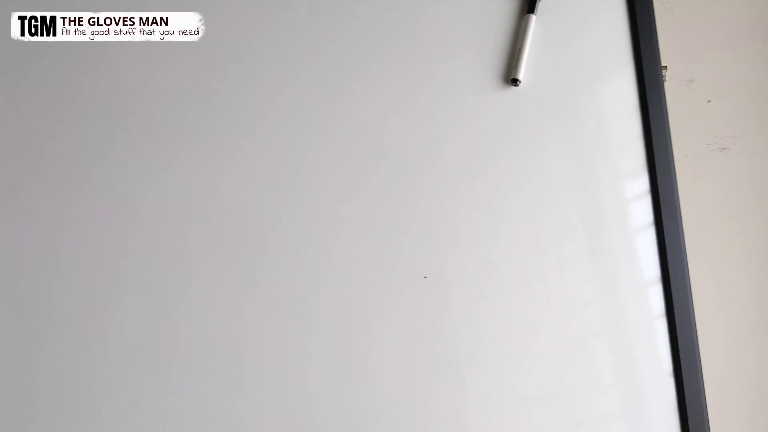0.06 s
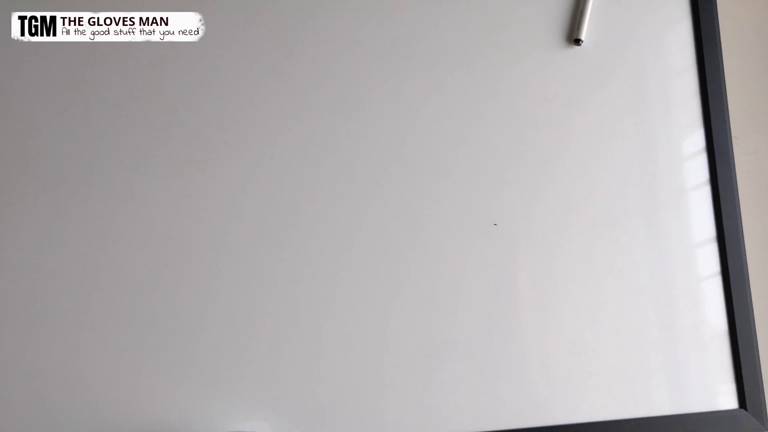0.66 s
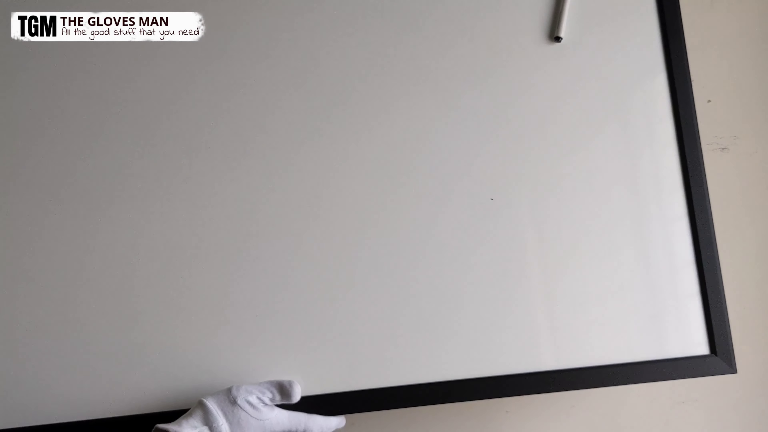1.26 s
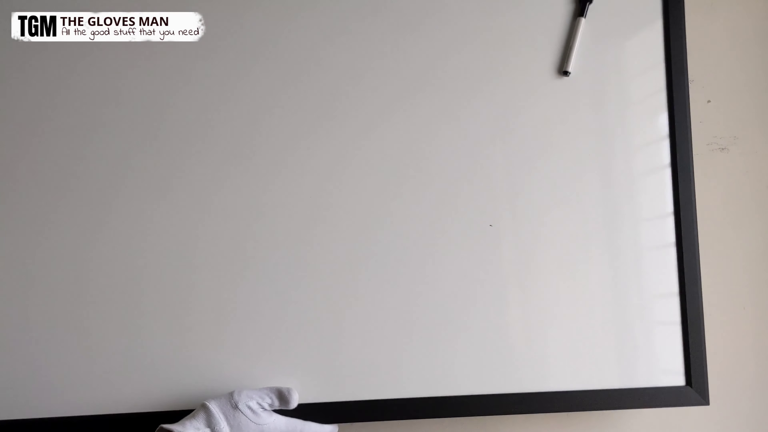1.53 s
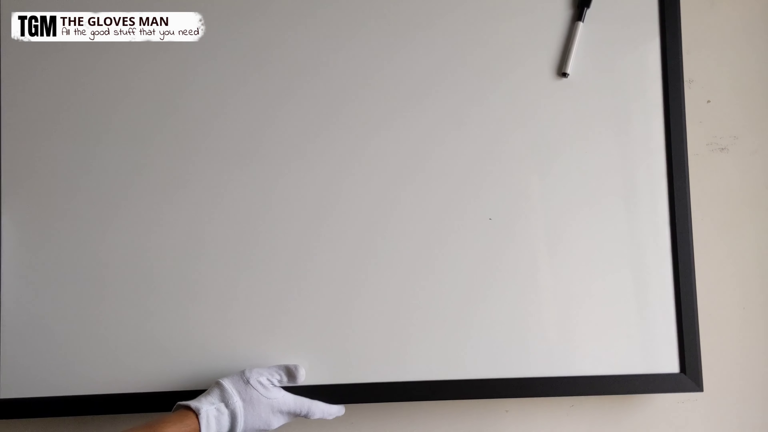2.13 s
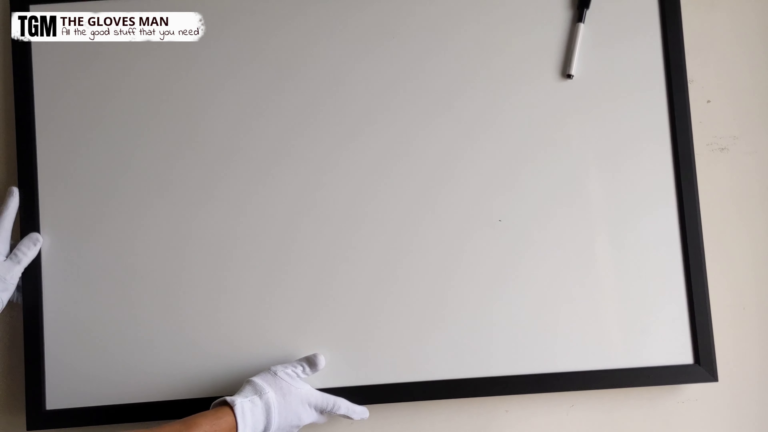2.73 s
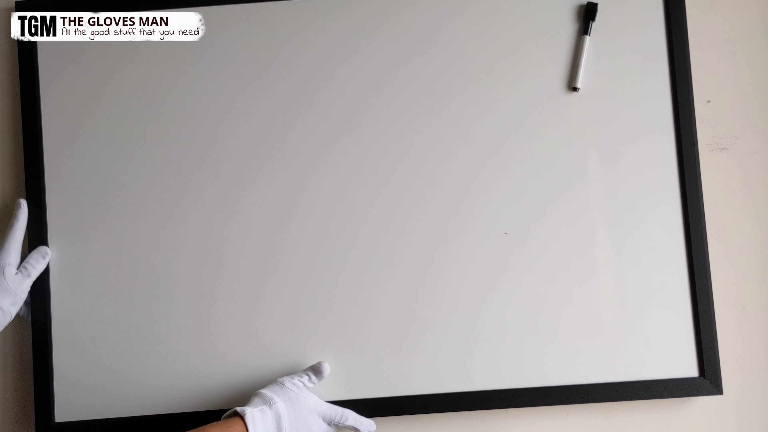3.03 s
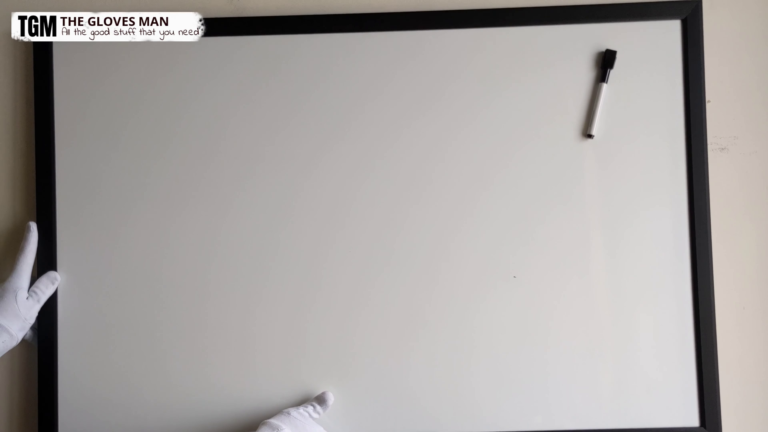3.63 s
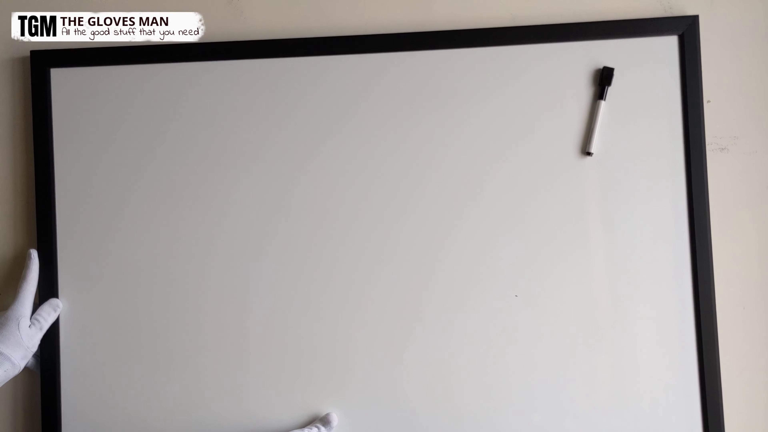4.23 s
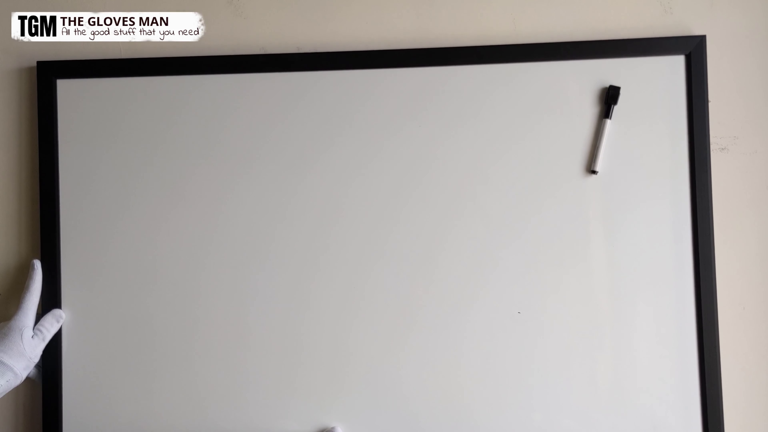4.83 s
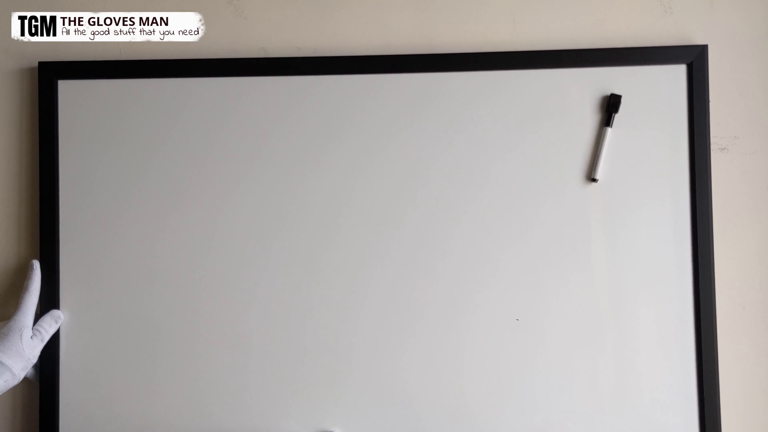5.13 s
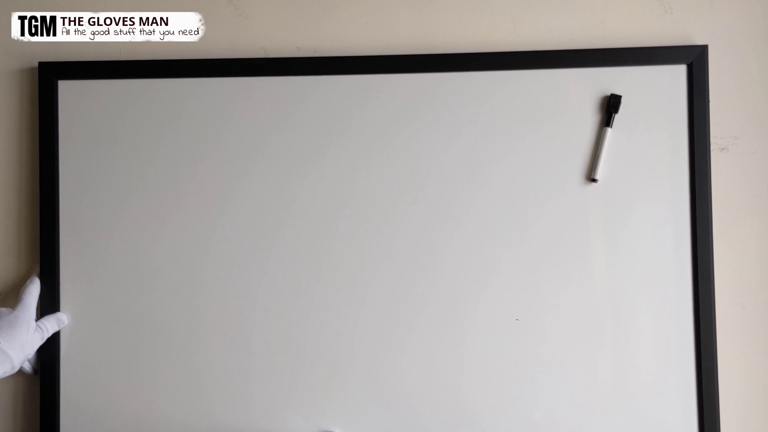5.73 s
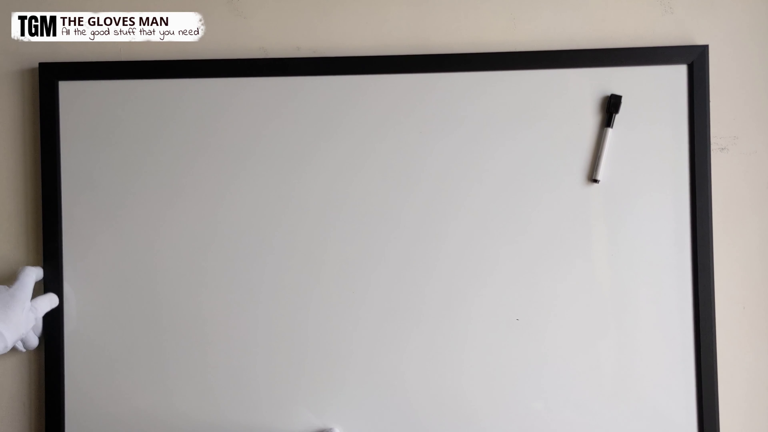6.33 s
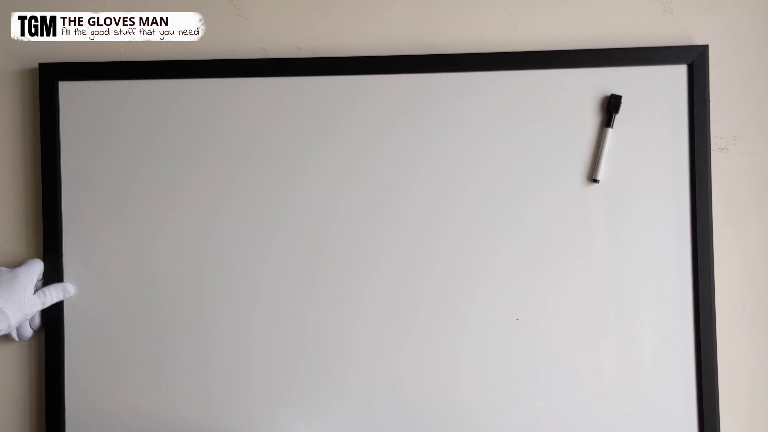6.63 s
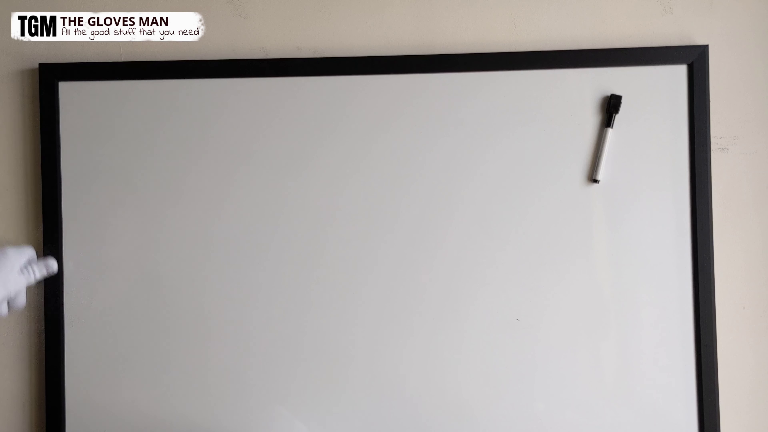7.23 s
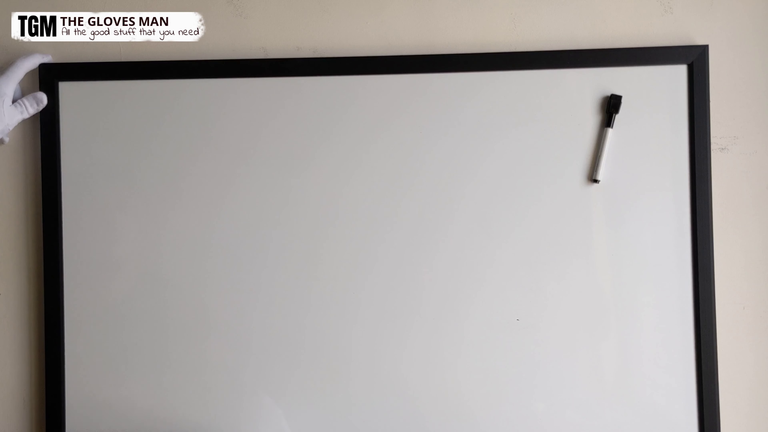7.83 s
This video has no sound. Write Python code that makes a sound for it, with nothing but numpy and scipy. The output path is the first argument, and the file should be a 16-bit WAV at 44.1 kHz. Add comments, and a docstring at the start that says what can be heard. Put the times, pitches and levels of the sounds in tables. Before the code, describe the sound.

A framed whiteboard is hung on a wall in a small, bare room, heard from close by. A soft thud leads to a quick cluster of hollow knocks against the wall clips. The frame drags faintly over the clips, then its back hisses down the plaster. A clip ticks, and one harder knock seats the board. Cotton gloves brush the frame very softly over quiet room air.

```python
"""A small room with bare walls, heard in mono from close by: a framed whiteboard is being hung.
The frame knocks on its wall clips and drags over them; the back hisses down the plaster; a clip ticks
and a hard knock seats the board. Knocks ring the panel's modes, and the ring shifts as the board sinks
into the clips. Drags, slide and cotton gloves are random friction slips that swell, hold and fade.
Underneath are room air, the rumble of the swaying panel and a very faint high whine."""
import sys
import numpy as np
from scipy import signal
from scipy.fft import rfft, irfft, next_fast_len
from scipy.io import wavfile
from scipy.ndimage import uniform_filter1d

SR = 44100
rng = np.random.default_rng(int(sys.argv[2]) if len(sys.argv) > 2 else 0)


def wav_record(signal):
    """Record a signal, one row per channel, as 16-bit PCM in the file named by sys.argv[1]."""
    frames = np.transpose(np.atleast_2d(signal))
    bounded = np.clip(frames, -1, 1)
    # unit amplitude maps onto the largest positive 16-bit level
    quanta = np.round(bounded * 32767).astype(np.int16)
    wavfile.write(sys.argv[1], SR, quanta)


N = 352089
TIME = np.arange(N) / SR


def undb(db):
    """Decibels to gain."""
    return 10 ** (np.asarray(db) / 20)


def unit_rms(x):
    """Scale to rms 1."""
    return x / np.sqrt(np.mean(x ** 2))


def unit_blow(x):
    """Scale to the energy of 10 ms at rms 1."""
    return x / np.sqrt(np.sum(x ** 2) / (.01 * SR))


def decay(t, t60_s):
    """Exponential fade, 60 dB down at t60_s."""
    return np.exp(-np.log(1000) * t / t60_s)


def add(out, start_s, x):
    """Mix x into out from start_s on."""
    i = max(int(start_s * SR), 0)
    out[i:i + len(x)] += x[:len(out) - i]


def bin_hz(size):
    """FFT bin frequencies, floored at 1 Hz."""
    return np.maximum(np.fft.rfftfreq(size, 1 / SR), 1)


def curve_db(points, hz):
    """Interpolate (Hz, dB) points over log frequency."""
    point_hz, db = np.transpose(points)
    return np.interp(np.log(hz), np.log(point_hz), db)


def peaks_db(rows, hz):
    """Lift from (Hz, width Hz, dB) resonances."""
    return sum(db / (1 + (2 * (hz - centre_hz) / width_hz) ** 2) for centre_hz, width_hz, db in rows)


def tilted(points, db_per_octave, pivot_hz):
    """Tilt (Hz, dB) points about a pivot."""
    return [(hz, db + db_per_octave * np.log2(hz / pivot_hz)) for hz, db in points]


def colour(x, db):
    """Minimum-phase filter with the given dB per bin."""
    cepstrum = irfft(np.log(undb(db)), len(x))
    cepstrum[1:len(x) // 2] *= 2
    cepstrum[len(x) // 2 + 1:] = 0
    return irfft(rfft(x) * np.exp(rfft(cepstrum)), len(x))


def tint(x, points, resonances=()):
    """Zero-phase filter for long sounds; output at rms 1."""
    size = next_fast_len(len(x))
    hz = bin_hz(size)
    db = curve_db(points, hz) + peaks_db(resonances, hz)
    return unit_rms(irfft(rfft(x, size) * undb(db), size)[:len(x)])


def wander(rate_hz):
    """Smooth random drift at rms 1."""
    step = max(int(SR / rate_hz), 1)
    stairs = np.repeat(rng.standard_normal(N // step + 1), step)
    return unit_rms(uniform_filter1d(stairs, step)[:N])


def friction(slips_per_s, flutter_db, flutter_hz):
    """Tiny asperities let go at random while the pressure flutters."""
    slips = (rng.random(N) < slips_per_s / SR) * rng.standard_normal(N)
    return slips * undb(flutter_db * wander(flutter_hz))


def rub_gain(start_s, hold_s, attack_s, release_s, range_db=20):
    """One rub: swells to 1 by start_s, holds, fades; range_db per attack or release time."""
    early_s = np.maximum(start_s - TIME, 0)
    late_s = np.maximum(TIME - start_s - hold_s, 0)
    return undb(-range_db * np.minimum(early_s / attack_s + late_s / release_s, 10))


SLIDE_START_S, SLIDE_HOLD_S = 3.584, 1.671
def sliding():
    """How firmly the board moves along the plaster, 0 to 1."""
    return rub_gain(SLIDE_START_S, SLIDE_HOLD_S, attack_s=0.15, release_s=0.21)


# Room air spectrum. Each row: frequency in Hz, relative density in dB.
AIR_SPECTRUM = [(59, -28), (100, -9.5), (193, -2.5), (219, -8), (288, -4.5), (431, -7.5), (511, -6),
                (1070, -17), (1170, -16.5), (1330, -18.5), (2720, -31.5), (11000, -46.5), (15800, -65)]
# Spectrum of the air fanned by the panel. Each row: frequency in Hz, relative density in dB.
SWAY_SPECTRUM = [(3, -3.5), (8, -10.5), (16, -9), (25, -12), (33, -20.5), (42, -17.5), (51, -12.5),
                 (62, -27), (80, -32), (120, -30), (200, -68)]
def background(air_db=-60.5, sway_db=-49.5, pressed_db=-3, whine_hz=14700, whine_db=-97):
    """Room air, a faint whine, and air fanned by the swaying panel, less while it slides on the wall."""
    air = tint(rng.standard_normal(N), AIR_SPECTRUM) * undb(air_db + .5 * wander(4.5))
    rumble = tint(rng.standard_normal(N), SWAY_SPECTRUM)
    rumble *= undb(sway_db + wander(2.916) + pressed_db * sliding())
    whine = undb(whine_db) * np.sin(2 * np.pi * whine_hz * TIME)
    return air + rumble + whine


# Room echo bands. Each row: centre in Hz, T60 in seconds, gain in dB.
ECHO_BANDS = [(150, 0.49, -2), (396, 0.46, -6.5), (1000, 0.52, -13.5), (2770, 0.43, -3.5), (7000, 0.4, -5),
              (14000, 0.4, -18)]
def room_echo(x, first_echo_s=0.0066, build_s=0.0036, size=32768):
    """Diffuse echo of bare walls, each band dying at its own rate."""
    t, hz = np.arange(size) / SR, bin_hz(size)
    noise_spectrum = rfft(rng.standard_normal(size))
    onset = 1 - np.exp(-np.maximum(t - first_echo_s, 0) / build_s)
    log_centres = np.log([row[0] for row in ECHO_BANDS])
    response = np.zeros(size)
    for (_, t60_s, db), share in zip(ECHO_BANDS, np.eye(len(ECHO_BANDS))):
        fade = onset * decay(t, t60_s)
        band = irfft(noise_spectrum * np.interp(np.log(hz), log_centres, share), size)
        response += undb(db) * band * fade / np.sqrt(np.sum(fade ** 2))
    return signal.fftconvolve(x, response)[:N]


# Spectrum of cotton on the frame. Each row: frequency in Hz, relative level in dB.
COTTON_SPECTRUM = [(800, -3.5), (2200, -3.5), (3300, -2.5), (5000, -2), (7000, -3), (11000, 0),
                   (13000, -6.5), (15500, -18)]
def cotton(fibres, tilt_db_per_octave):
    """Fibre slips heard as cloth on the frame; more tilt is brighter."""
    return tint(fibres, tilted(COTTON_SPECTRUM, tilt_db_per_octave, pivot_hz=6000))


# Glove strokes. Each row: start in seconds, hold in seconds, level in dB, tilt in dB per octave.
GLOVE_STROKES = [(0.59, 0.075, -76, -5.5), (0.71, .02, -64, -9.5), (2.21, 0.075, -71, -1),
                 (2.52, 0.21, -72, 0), (2.76, 0.017, -69.5, 17.5), (3.018, 0.2, -66.5, -4),
                 (5.713, 0.013, -69.5, 7), (5.725, 0.093, -64, -6.5), (5.924, 0.064, -62.5, -7),
                 (6.212, 0.019, -58, -4.5), (6.533, 0.13, -68.5, -0.5), (6.738, 0.018, -67.5, -6),
                 (6.837, 0.031, -68, -3.5), (7.067, 0.086, -63, -3.5), (7.207, 0.057, -68, -3.5),
                 (7.439, 0.082, -61, 2), (7.66, 0.053, -71.5, -2)]
def gloves(carry_s=1.14, rustle_db=-74.5, attack_s=0.049):
    """Cotton rustles while the board is carried, then brushes the frame in soft swells."""
    fibres = friction(slips_per_s=12000, flutter_db=2.0, flutter_hz=45)
    carrying = rub_gain(0, carry_s, attack_s, release_s=0.24)
    out = cotton(fibres, tilt_db_per_octave=-5) * carrying * undb(rustle_db + 2.5 * wander(20))
    for start_s, hold_s, db, tilt in GLOVE_STROKES:
        swell = rub_gain(start_s, hold_s, attack_s, release_s=0.1)
        heard = swell > .01
        out[heard] += undb(db) * swell[heard] * cotton(fibres[heard], tilt)
    return out


# Clip and marker ticks. Each row: start in seconds, level in dB, tilt in dB per octave.
TICK_EVENTS = [(1.1395, -65.5, -5.5), (1.602, -74, 2), (1.613, -74, -4), (2.0, -64, 0), (2.346, -63, -5),
               (5.6566, -46.5, 0), (6.288, -63, 0)]
# Tick spectrum. Each row: frequency in Hz, relative level in dB.
TICK_SPECTRUM = [(500, -16), (1500, -9), (2800, 3), (4050, -8), (5800, 4), (7500, -7), (9000, 3.5),
                 (11500, -2), (15500, -28)]
def ticks(grit_gain=0.11, grit_decay_s=0.00041, size=2048):
    """Small hard snaps of the wall clips and the marker: an impulse with a gritty tail."""
    out, t, hz = np.zeros(N), np.arange(size) / SR, bin_hz(size)
    for start_s, db, tilt in TICK_EVENTS:
        grit = grit_gain * rng.standard_normal(size) * np.exp(-t / grit_decay_s)
        spectrum_db = curve_db(tilted(TICK_SPECTRUM, tilt, pivot_hz=5000), hz)
        snap = colour(signal.unit_impulse(size) + grit, spectrum_db)
        add(out, start_s, undb(db) * unit_blow(snap))
    return out


# Drags over a wall clip. Each row: start in seconds, hold in seconds, level in dB.
DRAG_MOVES = [(2.94, 0.21, -57), (3.409, 0.066, -53.5), (3.53, 0.23, -59), (3.997, 0.6, -61),
              (5.02, 0.28, -66)]
# Drag spectrum. Each row: frequency in Hz, relative level in dB.
DRAG_SPECTRUM = [(300, -5.5), (600, -2), (1100, -1.5), (1700, -5.5), (2500, -14), (4500, -19), (7000, -20),
                 (11000, -24.5), (15500, -38)]
# Frame resonances. Each row: centre in Hz, width in Hz, lift in dB.
FRAME_RESONANCES = [(772, 94, 8.5), (1416, 24, 6.5), (1550, 41, 7.5), (1867, 42, 8), (2220, 36, 6.5),
                    (2570, 100, 9), (2900, 89, 7)]
def frame_drags(attack_s=0.23, release_s=0.24):
    """Coarse friction on a wall clip excites narrow resonances of the frame."""
    slips = friction(slips_per_s=4300, flutter_db=1.0, flutter_hz=31)
    moves = [undb(db) * rub_gain(start_s, hold_s, attack_s, release_s)
             for start_s, hold_s, db in DRAG_MOVES]
    return tint(slips, DRAG_SPECTRUM, FRAME_RESONANCES) * np.max(moves, axis=0)


# Spectrum of the board on plaster. Each row: frequency in Hz, relative level in dB.
PLASTER_SPECTRUM = [(900, -15), (1500, -18), (2100, -6), (2800, 0.5), (3700, -1), (5000, -3), (5700, -1.5),
                    (6600, 2.5), (8500, 0.5), (11200, 2), (13000, -6), (15800, -16)]
def plaster_slide(start_db=-53, sag_db_per_s=0.44):
    """The board's back slides down the plaster: dense slips make an even hiss that eases a little."""
    slips = friction(slips_per_s=25000, flutter_db=0.2, flutter_hz=20)
    level_db = start_db - sag_db_per_s * (TIME - SLIDE_START_S)
    return tint(slips, PLASTER_SPECTRUM) * sliding() * undb(level_db)


# Panel flexes. Each row: start in seconds, pitch in Hz, T60 in seconds, level in dB.
PANEL_FLEXES = [(0.949, 183, 0.13, -41.5), (2.0, 44.7, 0.19, -42.5), (2.518, 104, 0.088, -32),
                (2.524, 243, 0.13, -34), (2.509, 48.7, 0.2, -35.5), (2.96, 49.5, 0.44, -41.5)]
def panel_thuds(rise_s=0.0018, size=16384):
    """Heavy blows and the first drag flex the whole panel, one low mode per flex."""
    out, t = np.zeros(N), np.arange(size) / SR
    onset = 1 - np.exp(-t / rise_s)
    for start_s, hz, t60_s, db in PANEL_FLEXES:
        add(out, start_s, undb(db) * np.sin(2 * np.pi * hz * t) * onset * decay(t, t60_s))
    return out


# Panel and frame modes. Each row: frequency in Hz, T60 in seconds, relative dB loose, relative dB seated.
BOARD_MODES = [(125.7, 0.21, -18, -29), (189.8, 0.5, -23.5, -26), (258, 0.26, -10.5, -17.5),
               (293.5, 0.075, -2, -14), (320.6, 0.27, -7.5, -34), (384, 0.13, -15, -22),
               (442.7, 0.22, -10, 4), (498.5, 0.21, -9, -5.5), (589, 0.13, -8.5, -5), (736, 0.16, -6, -19),
               (801, 0.055, 2.5, 3), (882, 0.08, -9, 2), (920, 0.084, -33, -3), (1050, 0.055, -15, -9),
               (1113, 0.038, 3.5, 2), (1319, 0.077, -9.5, -0.5), (1467, 0.042, -1, -24),
               (1745, 0.056, -5, -9), (1820, 0.037, -5.5, -12), (2120, .06, -33, -33),
               (2470, 0.018, -34, 5), (2920, .06, -35, -11)]
def board_ring(t, seated):
    """Pinning the frame shifts the ring to other modes; neighbours swing in opposite senses."""
    ring = np.zeros(len(t))
    for k, (hz, t60_s, loose_db, seated_db) in enumerate(BOARD_MODES):
        gain = undb(loose_db + seated * (seated_db - loose_db))
        ring += (-1) ** k * gain * np.sin(2 * np.pi * hz * t) * decay(t, t60_s)
    return ring


# Spectrum of the panel's dense, short-lived modes. Each row: frequency in Hz, relative level in dB.
PANEL_SPECTRUM = [(60, -12.5), (250, -11.5), (550, 2), (850, 4), (1200, -3), (1500, -2.5), (1950, -6.5),
                  (2700, -12.5), (5000, -13), (9000, -16), (15000, -23)]
def knock(contact_hz, weight_db, ring_db, seated, waves_db=-2, waves_t60_s=0.058, size=16384):
    """One blow: a frame clack, dense dying panel waves and ringing modes; seated runs 0 to 1."""
    t, hz = np.arange(size) / SR, bin_hz(size)
    panel_db = curve_db(PANEL_SPECTRUM, hz)
    frame_hz = np.interp(seated, [0, 1], [1130, 680])  # lower against the wall
    frame_db = peaks_db([(frame_hz, 560, 6)], hz) - 10 * np.log10(1 + (hz / 3200) ** 2)
    clack = colour(signal.unit_impulse(size), panel_db + frame_db)
    burst = rng.standard_normal(size) * decay(t, waves_t60_s) * (1 - np.exp(-t / 0.00069))
    waves = colour(burst, panel_db)
    tail = undb(waves_db) * unit_blow(waves) + unit_blow(board_ring(t, seated))
    blow = disperse(unit_blow(clack) + undb(ring_db) * tail)
    soft_contact_db = -10 * np.log10(1 + (hz / contact_hz) ** 4.05)
    bending_db = weight_db / (1 + (hz / 680) ** 6)  # a heavy blow bends the whole panel
    pinned_db = -6 * seated / (1 + (hz / 330) ** 6)  # a pinned panel cannot swing widely
    return unit_blow(colour(blow, soft_contact_db + bending_db + pinned_db))


def disperse(x, delay_at_1khz_s=0.000897):
    """Bending waves spread: treble runs ahead, bass arrives late."""
    phase = 4 * np.pi * delay_at_1khz_s * np.sqrt(1000 * bin_hz(len(x)))
    return irfft(rfft(x) * np.exp(-1j * phase), len(x))


# Blows on the frame. Each row: start in seconds, level in dB, contact cut-off in Hz,
# bass weight in dB, ring against the clack in dB.
FRAME_BLOWS = [(0.991, -51.5, 182, 16, -9), (1.9951, -31, 1290, 3.5, 3), (2.3457, -25, 1770, -5.5, 1.5),
               (2.4413, -35.5, 1480, -2, -2), (2.5114, -25, 1450, 4.5, 7), (2.528, -33, 300, 10, -10),
               (2.5453, -31.5, 1250, 3, 14), (2.5809, -32.5, 1630, 1.5, -1.5), (2.645, -43, 520, 8, 8),
               (2.731, -43.5, 895, 2.5, 11), (2.899, -54, 1900, 6, 7), (3.199, -38.5, 970, -5, -2.5),
               (4.615, -47, 900, 5, 3), (5.235, -52.5, 1300, -14, 4), (6.281, -21.5, 2330, 1, 1.5),
               (6.2923, -38, 1300, -12, -1), (6.312, -39, 3000, -4, -1), (6.369, -40.5, 1000, -10.5, -1)]
def frame_knocks(loose_until_s=2.2, seated_at_s=7, seated_send_db=2):
    """Direct knocks and their echo send; as the board seats, the wall passes more to the room."""
    direct, send = np.zeros(N), np.zeros(N)
    for start_s, db, contact_hz, weight_db, ring_db in FRAME_BLOWS:
        seated = np.interp(start_s, [loose_until_s, seated_at_s], [0, 1])
        blow = undb(db) * knock(contact_hz, weight_db, ring_db, seated)
        add(direct, start_s, blow)
        add(send, start_s, blow * undb(seated * seated_send_db))
    return direct, send


def scene(knock_send_db=-2.5, tick_send_db=-5, rub_send_db=-4):
    """Board sounds, their echo and the background, alike in both channels."""
    knocks, knock_send = frame_knocks()
    thuds, snaps = panel_thuds(), ticks()
    rubs = frame_drags() + plaster_slide() + gloves()
    send = thuds + undb(knock_send_db) * knock_send + undb(tick_send_db) * snaps + undb(rub_send_db) * rubs
    mono = knocks + thuds + snaps + rubs + room_echo(send) + background()
    return np.tile(mono, (2, 1))


def record(dry):
    """The phone cuts the top with a steep low-pass."""
    top_hz = 15800
    return signal.sosfilt(signal.ellip(10, .2, 70, top_hz, fs=SR, output="sos"), dry)


dry = scene()
out = record(dry)
wav_record(out)
```